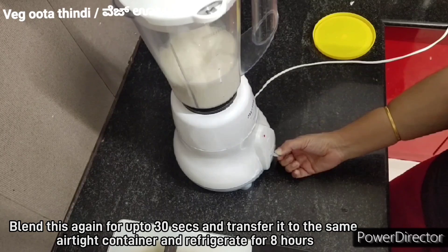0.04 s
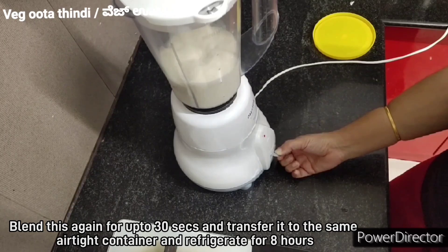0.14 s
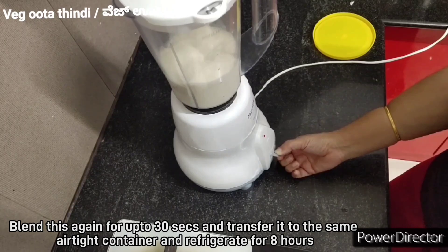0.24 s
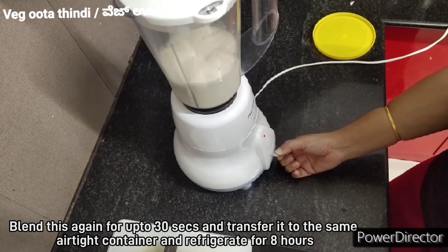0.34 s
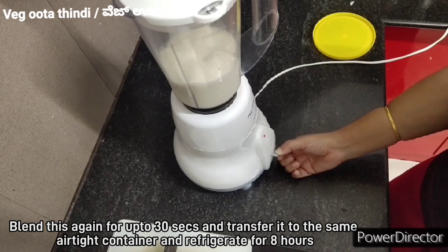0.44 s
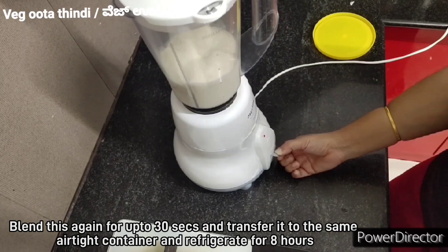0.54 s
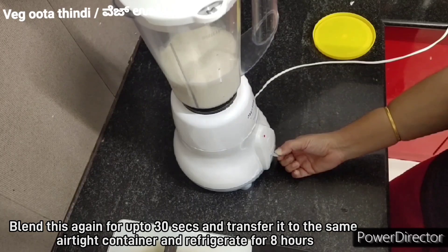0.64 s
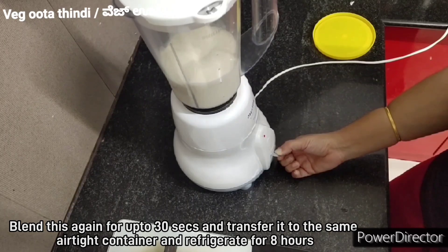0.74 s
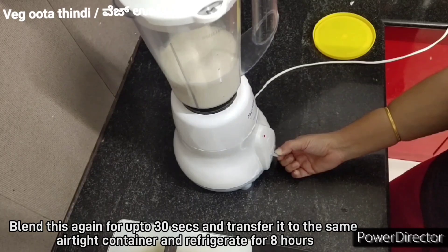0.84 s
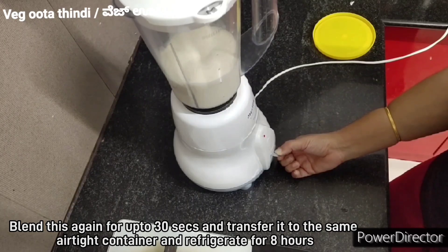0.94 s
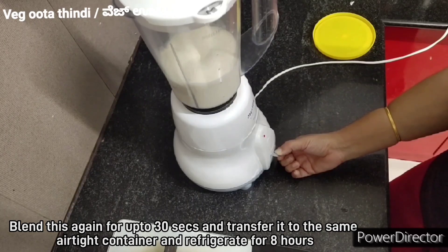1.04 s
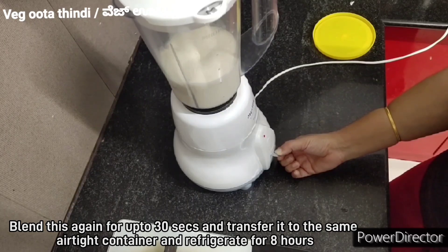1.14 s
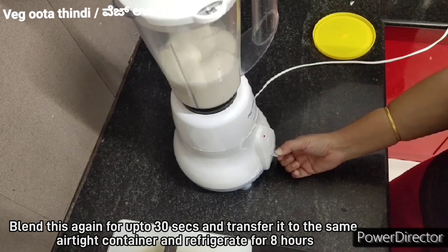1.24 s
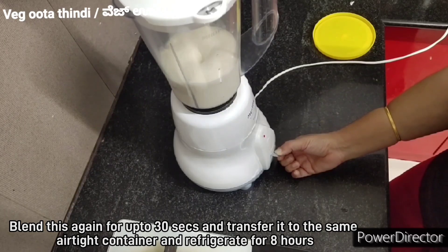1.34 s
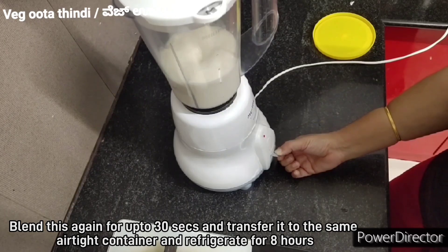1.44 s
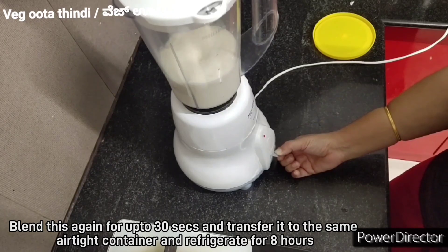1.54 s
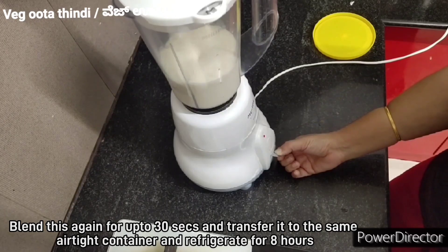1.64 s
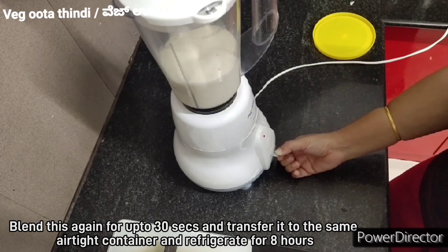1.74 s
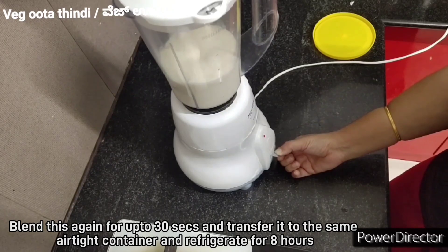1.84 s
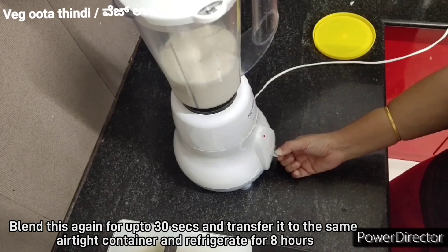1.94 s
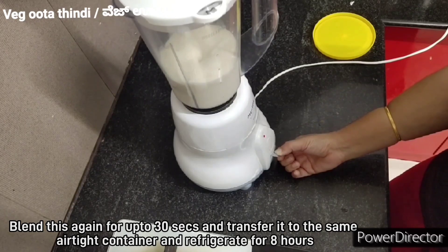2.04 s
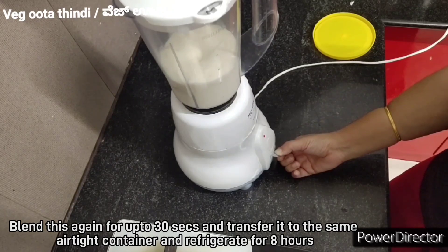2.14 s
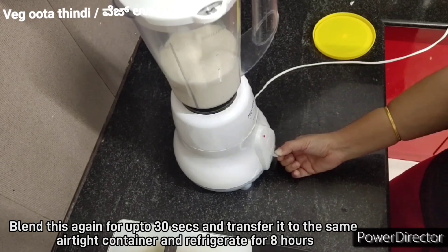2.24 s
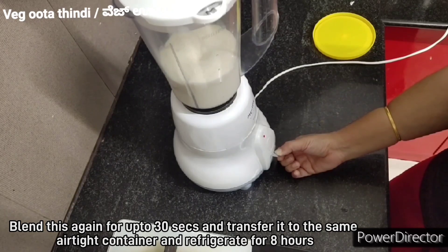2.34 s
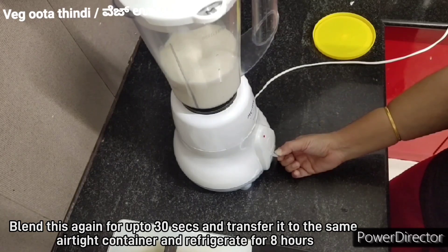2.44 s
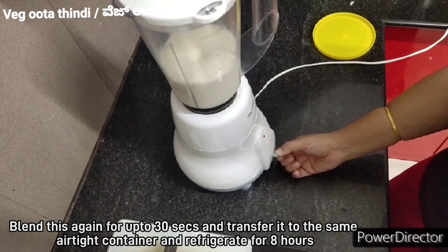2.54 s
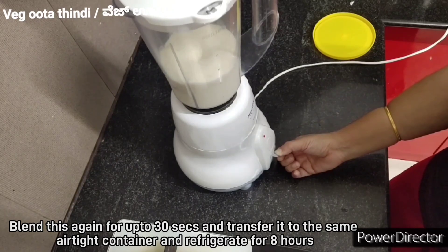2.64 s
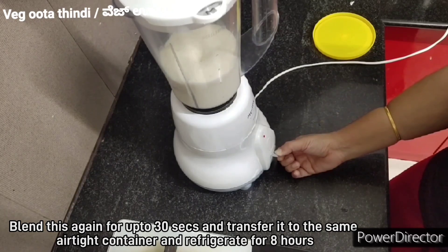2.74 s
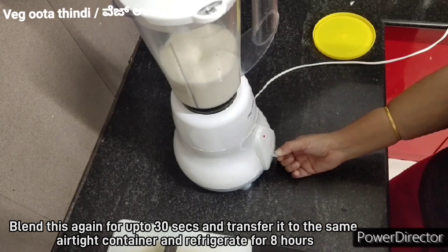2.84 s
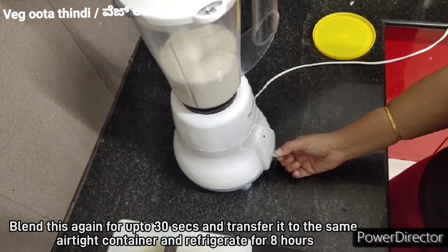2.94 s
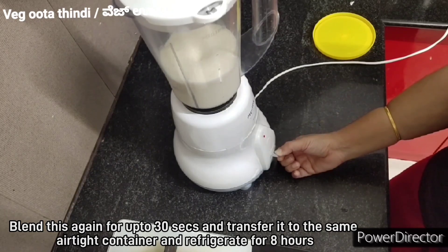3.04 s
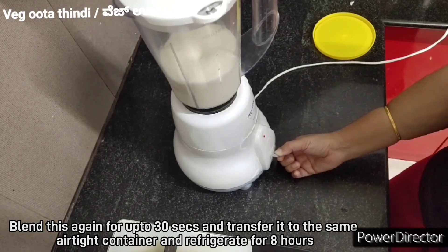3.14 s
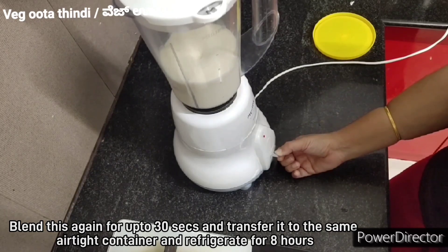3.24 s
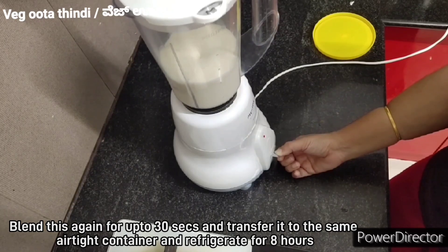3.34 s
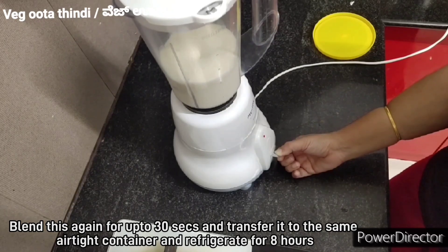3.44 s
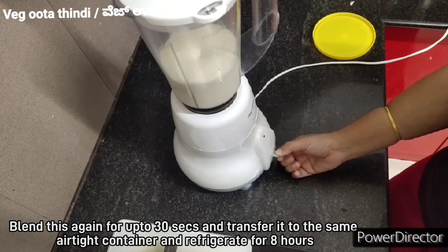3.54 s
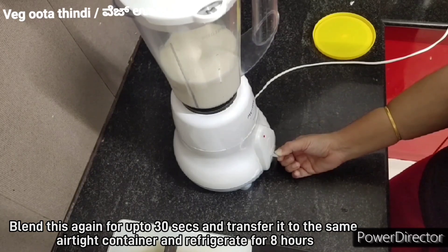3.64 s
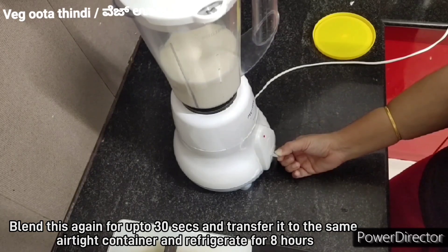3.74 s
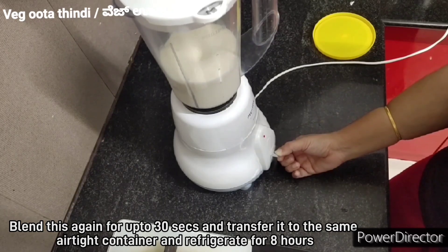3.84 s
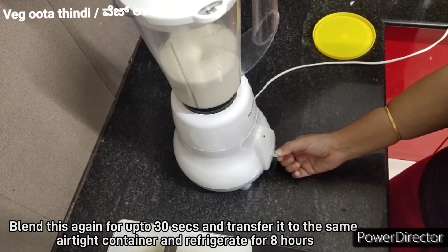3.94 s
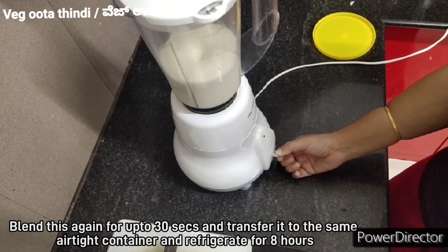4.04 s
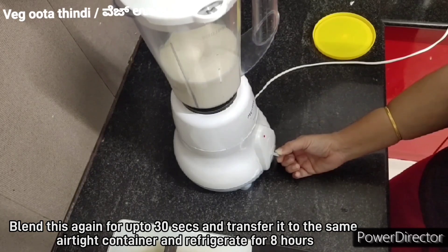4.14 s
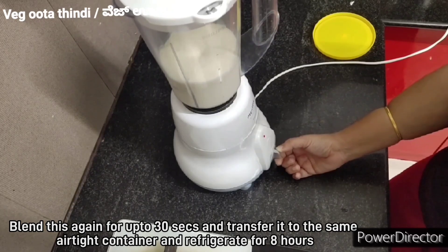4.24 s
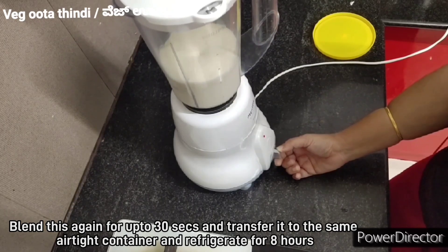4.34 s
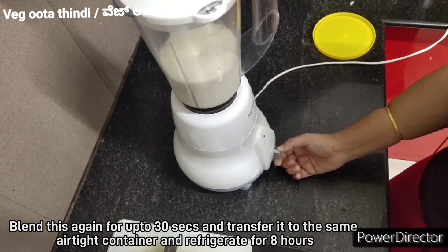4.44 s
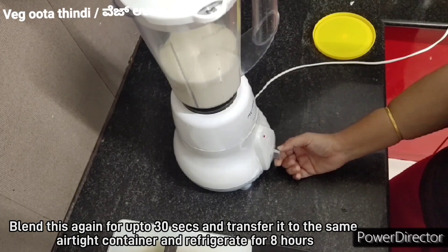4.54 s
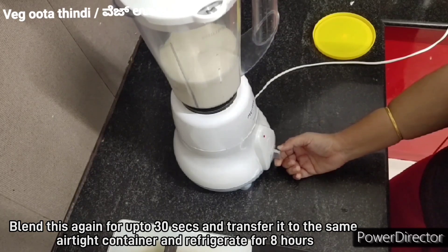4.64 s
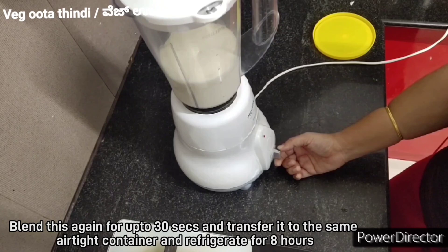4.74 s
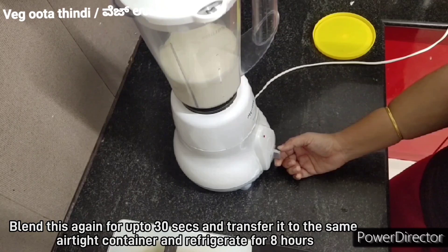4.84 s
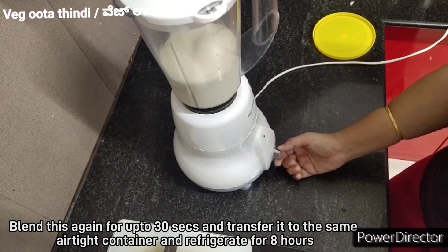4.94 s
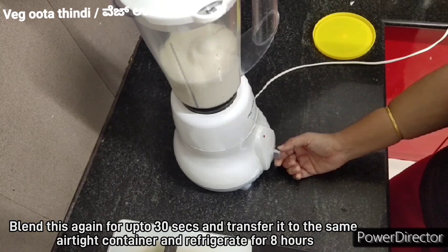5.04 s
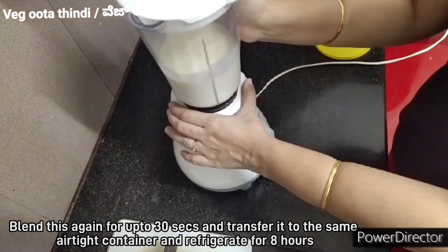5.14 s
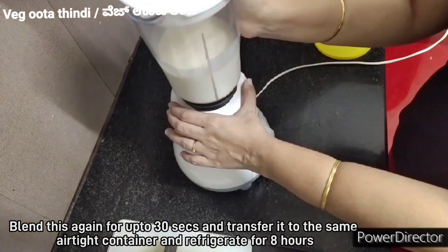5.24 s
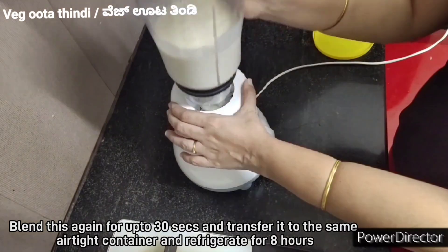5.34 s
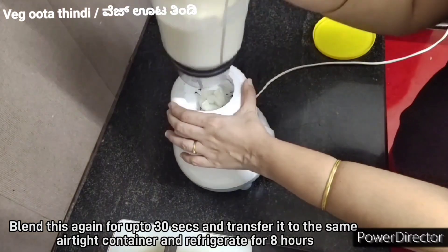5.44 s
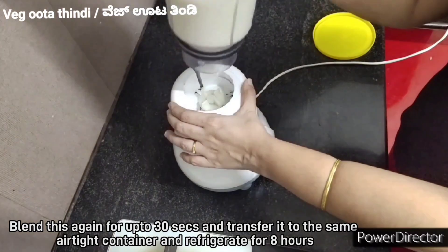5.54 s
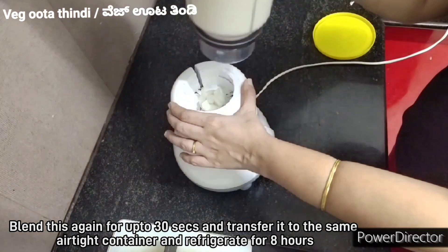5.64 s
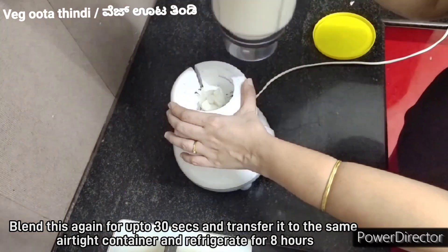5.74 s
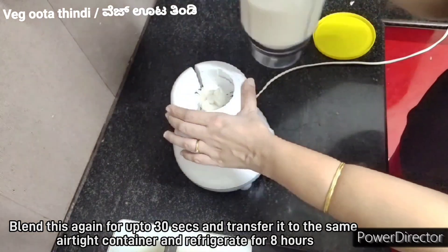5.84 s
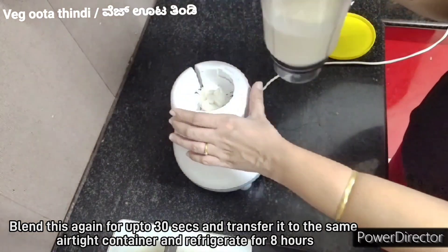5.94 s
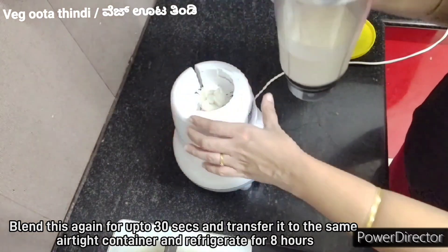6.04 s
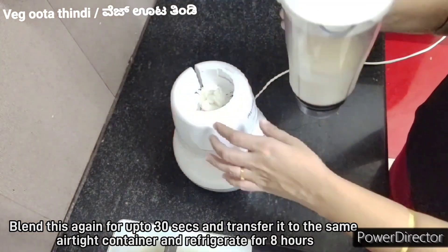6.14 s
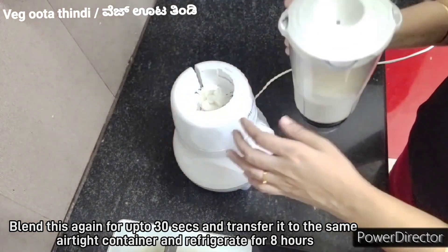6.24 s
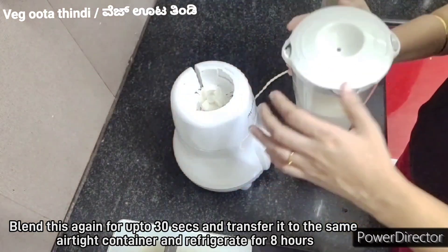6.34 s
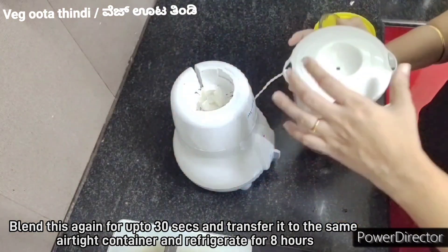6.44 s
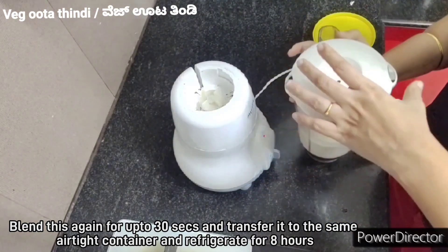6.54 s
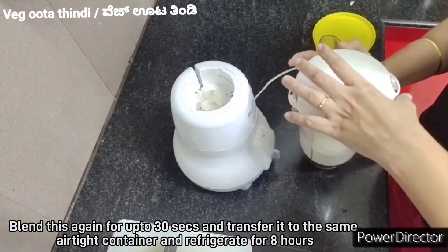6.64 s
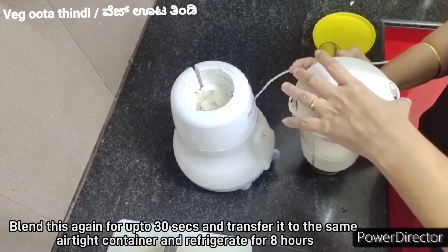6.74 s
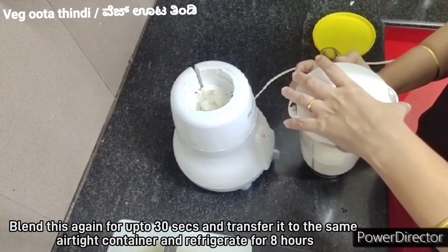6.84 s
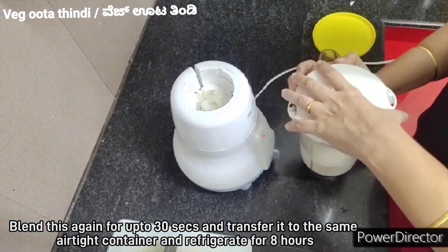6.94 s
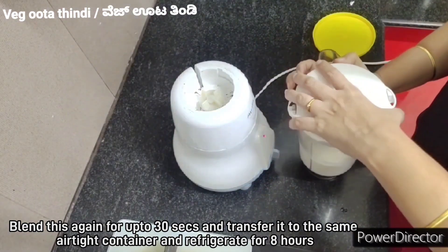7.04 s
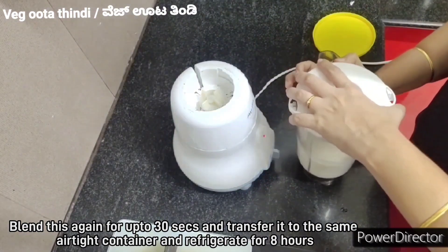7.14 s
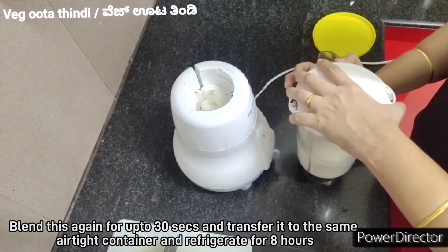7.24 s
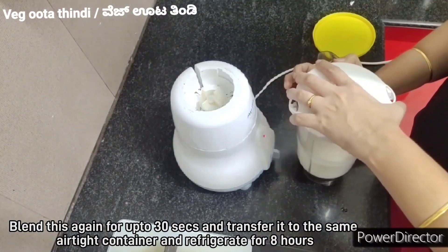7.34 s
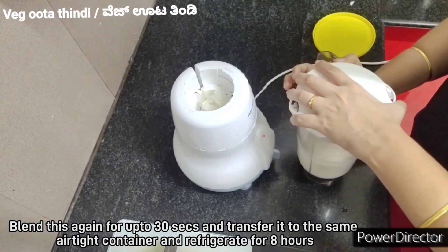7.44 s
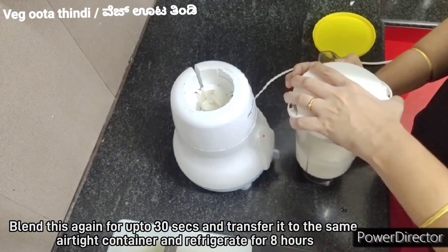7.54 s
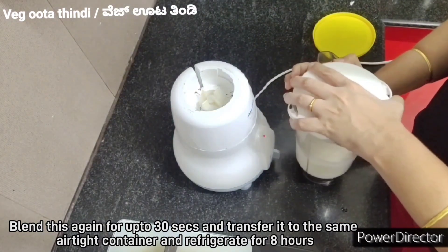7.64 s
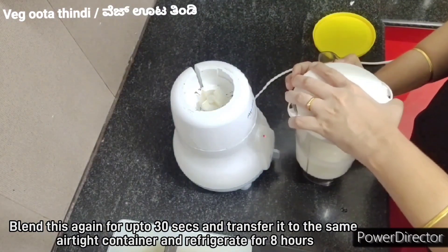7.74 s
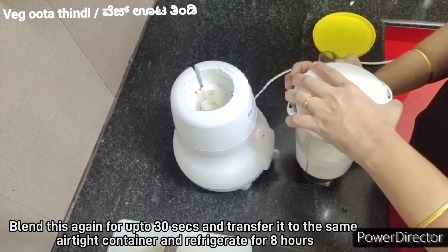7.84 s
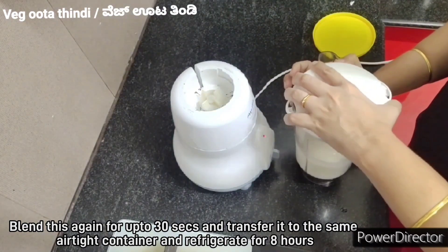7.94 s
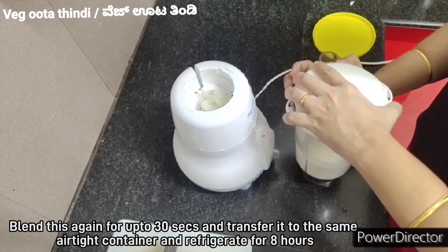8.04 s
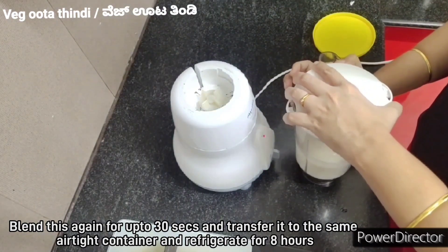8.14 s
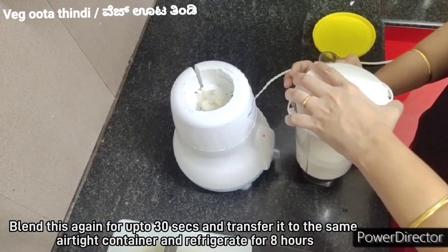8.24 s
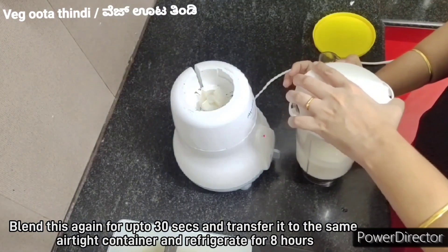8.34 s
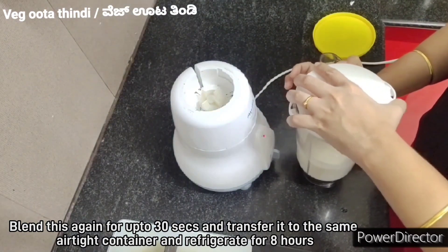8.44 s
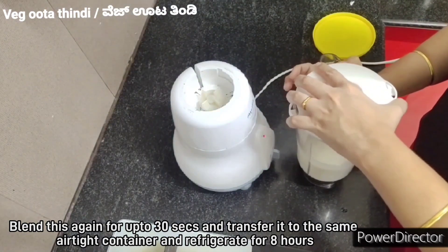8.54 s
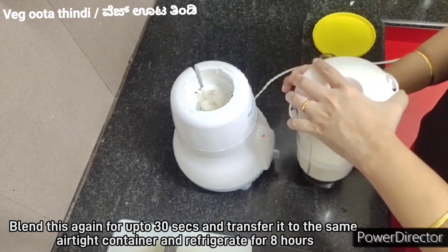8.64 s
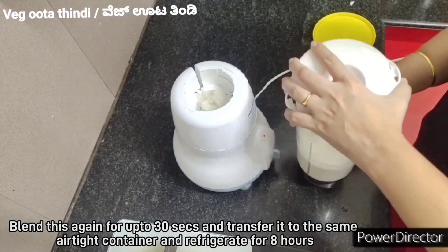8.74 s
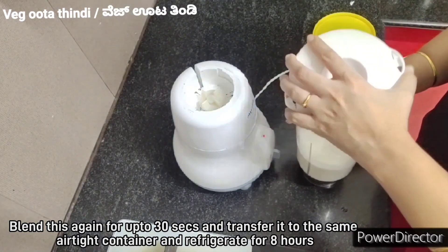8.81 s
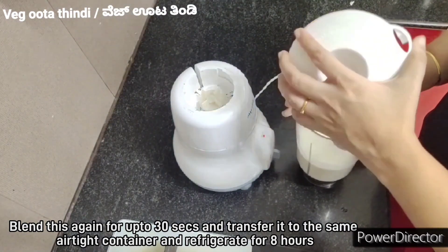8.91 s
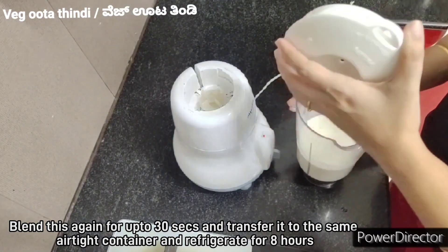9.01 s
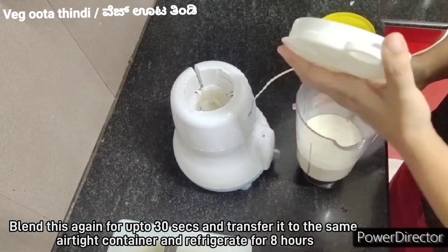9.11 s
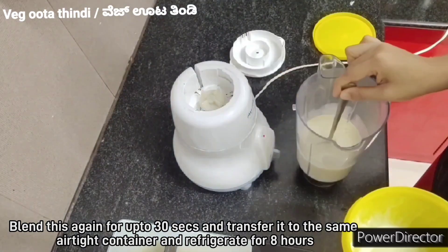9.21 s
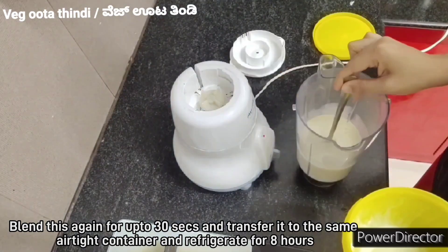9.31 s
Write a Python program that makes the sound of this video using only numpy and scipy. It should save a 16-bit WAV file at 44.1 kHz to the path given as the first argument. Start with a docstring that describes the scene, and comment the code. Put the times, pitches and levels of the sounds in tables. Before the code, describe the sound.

An electric blender hums and rattles as it churns a thick mix, its pitch rising in small steps. About halfway through it is switched off and coasts down with a light clatter. The plastic jar clicks off its base, then gives a few loud, hollow knocks on the stone counter. Rubs and smaller clicks follow as the tight lid is worked off. Everything sounds close, in a small tiled kitchen.

```python
"""A kitchen mixer-grinder hums and rattles as its blade churns a thick mix in a plastic jar.
It speeds up as the mix thins, is switched off and coasts down, coupling clattering, base shuddering.
The jar is twisted off its base and knocks on the stone counter; its tight lid is prised off with
rubs and clicks. A small tiled kitchen rings with the clatter and the handling, over a low rumble."""
import sys
import numpy as np
from scipy import signal
from scipy.fft import rfft, irfft, next_fast_len
from scipy.io import wavfile
from scipy.ndimage import uniform_filter1d, map_coordinates

SR = 44100
rng = np.random.default_rng(int(sys.argv[2]) if len(sys.argv) > 2 else 0)


def digitize_waveform(pressure):
    """Quantize a signal to 16-bit integers and store it at the path in sys.argv[1].

    Rows of a 2-D input are taken as channels; values are limited to [-1, 1].
    """
    field = np.atleast_2d(pressure).T
    bounded = np.clip(field, -1, 1)
    quanta = np.round(bounded * 32767).astype(np.int16)
    wavfile.write(sys.argv[1], SR, quanta)


N = 413254
TIME_S = np.arange(N) / SR


def amp(db):
    """Decibels to gain."""
    return 10 ** (np.asarray(db) / 20)


def unit(x):
    """Scale to rms 1."""
    return x / np.sqrt(np.mean(x ** 2) + 1e-20)


def along(points, hz):
    """(Hz, value) points read on a log axis."""
    knots_hz, values = np.transpose(points)
    return np.interp(np.log(hz + 1), np.log(knots_hz + 1), values)


def bells(rows, hz):
    """Sum of bell-shaped resonances."""
    return sum(height / (1 + (2 * (hz - centre) / width) ** 2) for centre, width, height in rows)


def wobble(rate_hz):
    """Smooth random curve, rate_hz knots a second."""
    knots = rng.standard_normal(int(N * rate_hz / SR) + 4)
    steps = np.arange(0, len(knots) - 1, 1 / 8)
    return np.interp(np.arange(N) * (rate_hz / SR), steps, map_coordinates(knots, [steps]))


def filtered(x, response):
    """Apply a gain given as a function of Hz."""
    length = x.shape[-1]
    size = next_fast_len(length + 8192, True)
    return irfft(rfft(x, size) * response(np.fft.rfftfreq(size, 1 / SR)), size)[..., :length]


# Stereo image. Each row: frequency in Hz, left-right correlation.
LIKENESS = [(60, 0.96), (110, 0.98), (200, 0.98), (380, 0.62), (700, 0.62), (1290, 0.099), (2380, 0.41),
            (4400, 0.12), (8120, 0.081), (15000, 0.07)]
def spread(pair):
    """Two unrelated signals become left and right: alike in the bass, less so in the treble."""
    def shares(hz):
        turn = np.arccos(np.clip(along(LIKENESS, hz), -1, 1)) / 2
        return np.array([np.cos(turn), np.sin(turn)])
    mid, side = filtered(pair, shares)
    return np.array([mid + side, mid - side])


def noise(spectrum, envelope=1):
    """Stereo noise of rms 1, modulated, then coloured."""
    white = spread(envelope * rng.standard_normal((2, N)))
    return unit(filtered(white, lambda hz: amp(along(spectrum, hz))))


def swirl(x, depth_db):
    """Narrow bands flare and sink, as when the mix tumbles or a rubbing contact shifts; rms 1."""
    bands = signal.stft(x, nperseg=1024)[2]
    field = uniform_filter1d(rng.standard_normal(bands.shape[1:]), size=4, axis=1)
    flare = amp(depth_db * unit(np.tanh(unit(field))))
    return unit(signal.istft(bands * flare, nperseg=1024)[1][:, :N])


def impulse(spectrum, pitch=1, size=4096):
    """Minimum-phase pulse with this spectrum, transposed by the factor pitch."""
    cepstrum = irfft(np.log(amp(along(spectrum, np.fft.rfftfreq(size, 1 / SR) / pitch))))
    cepstrum[1:size // 2] *= 2
    cepstrum[size // 2 + 1:] = 0
    return irfft(np.exp(rfft(cepstrum)))


# Shaft under power. Each row: time in seconds, speed in Hz.
SHAFT_SPEED = [(0.0, 113.4), (0.61, 114.8), (0.84, 116.7), (1.68, 116.1), (1.9, 133.7), (1.97, 137.7),
               (2.11, 137.2), (2.31, 129.3), (2.38, 130.1), (2.52, 135.6), (3.18, 135.6), (3.48, 144.3),
               (4.0, 144.3), (4.2, 140.8), (4.33, 143.1), (4.53, 156), (4.6, 153.4)]
FULL_HZ = 144
def shaft(off_s=4.586, drag_s=.57, stop_after_s=.79):
    """Powered speed in Hz, and coast: the share of it that drag and friction leave after switch-off."""
    drag = np.exp(-np.maximum(TIME_S - off_s, 0) / drag_s)
    friction = np.exp(-stop_after_s / drag_s)
    coast = np.maximum(drag - friction, 0) / (1 - friction)
    return np.interp(TIME_S, *np.transpose(SHAFT_SPEED)), coast


# Resonances of the base. Each row: centre in Hz, width in Hz, level in dB.
BASE_MODES = [(89, 24.5, -30), (116.3, 5, -42), (143.25, 19, -28.5), (224.2, 24, -35.5), (286.4, 35.5, -27),
              (358, 29, -36), (397.3, 16, -39)]
def hum(speed_hz, coast, angle):
    """The unbalanced blade pulls at the base; three orders sweep its resonances, shaken by lumps."""
    modes = [(hz, width, amp(db)) for hz, width, db in BASE_MODES]
    out = np.zeros(N)
    for order, shake_db in enumerate((.9, 1.3, 1.8), 1):
        level = bells(modes, order * speed_hz) * coast ** order * amp(shake_db * wobble(28))
        out -= level * np.cos(order * angle)
    return out


# Motor lines. Each row: multiple of the shaft speed, level in dB against the churning.
MOTOR_ORDERS = [(4, -12.5), (6, -14), (7, -15.5), (9, -14.5), (12, -24), (19, -23), (48, -27.5)]
def whine(angle):
    """The motor's weak upper lines waver in level and phase."""
    return sum(amp(db + 2.5 * wobble(14)) * np.sin(round(order) * angle + .8 * wobble(22))
               for order, db in MOTOR_ORDERS)


# Churning mix. Each row: frequency in Hz, relative density in dB.
CHURN_SPECTRUM = [(25, -26), (55, -30), (100, -10), (200, -14), (330, -6), (500, -5.5), (800, 1.5),
                  (1000, -2.5), (1400, -4), (1900, -9), (3000, -52.5)]
def churn(angle):
    """The blade slaps the mix unevenly, a little harder once a turn."""
    slaps = amp(0.79 * wobble(260) + 0.82 * wobble(40)) * (1 + 0.093 * np.sin(angle))
    return swirl(noise(CHURN_SPECTRUM, slaps), depth_db=1.8)


# Drive rattle, rasp and lumps. Each row: frequency in Hz, relative density in dB.
RATTLE_SPECTRUM = [(700, -28.5), (1400, -1), (1900, -1), (2500, 4), (3600, 2), (4400, -9), (5200, -7.5),
                   (6500, -58.5), (10000, -55)]
def rattle(angle):
    """The drive chatters in step with the shaft, along with the coupling's rasp and the lumps."""
    pulsing = 1 + .2 * np.sin(angle) + .14 * np.sin(4 * angle)
    chatter = noise(RATTLE_SPECTRUM, amp(1.6 * wobble(700) + 1.1 * wobble(30)) * pulsing)
    return swirl(amp(-3.3) * chatter + amp(-5) * rasp(angle) + amp(-9) * lumps(), depth_db=3.6)


def rasp(angle, turn_likeness=.79, play_rad=.3, play_hz=17, points=256):
    """The coupling rasps on each turn nearly as on the last; its play makes the partials waver."""
    place = np.maximum(angle + play_rad * wobble(play_hz), 0) / (2 * np.pi) * points
    turns = rng.standard_normal((2, N // points, points))
    roughness = signal.lfilter([1], [1, -turn_likeness], turns, axis=1).reshape(2, -1)
    pair = np.array([np.interp(place, np.arange(len(track)), track) for track in roughness])
    pair = (pair - pair[:, -1:]) * np.sqrt(np.abs(np.gradient(angle)))  # silent at a standstill
    return unit(filtered(spread(pair), lambda hz: amp(along(RATTLE_SPECTRUM, hz))))


def lumps(hits_per_s=38, scatter_db=3, decay_samples=256):
    """Lumps of the mix hit the blade at random; each is a short rattle in the jar."""
    hits = (rng.random(N) < hits_per_s / SR) * amp(scatter_db * np.tanh(rng.standard_normal(N)))
    decay = np.exp(-np.arange(4 * decay_samples) / decay_samples)
    return noise(RATTLE_SPECTRUM, signal.fftconvolve(hits, decay)[:N])


# Fan air. Each row: frequency in Hz, relative density in dB.
FAN_SPECTRUM = [(3000, -23.5), (5000, -8), (6000, 0), (7500, 0), (9000, -4.5), (10500, -9.5),
                (12500, -16.5), (15000, -18)]
def fan():
    """Air from the fan makes a fluttering hiss."""
    return swirl(noise(FAN_SPECTRUM, amp(1.2 * wobble(600) + .9 * wobble(35))), depth_db=2.5)


# Resonances and notches of jar and housing. Each row: centre in Hz, width in Hz, lift in dB.
HOUSING_COLOUR = [(214, 72, 10), (297, 19, 13), (417, 53, 2), (644, 74, 5.5), (702, 33, 3.5), (853, 18, 4),
                  (939, 200, -4.5), (1014, 13, 6.5), (1210, 150, 6.5), (1450, 22, 4), (1562, 100, -5.5),
                  (1740, 13, 8.5), (1870, 51, 5), (2045, 140, 6.5), (2148, 31, -10), (2196, 47, 7),
                  (2330, 41, 3), (2690, 50, 0), (2822, 39, 3), (2947, 48, -6.5), (3160, 60, -0.5),
                  (3270, 60, 1), (3683, 130, 3), (4180, 65, 9), (4290, 50, 8), (4450, 54, 8),
                  (4660, 50, 7.5)]
# Their stereo balance. Each row: frequency in Hz, left minus right in dB.
HOUSING_BALANCE = [(60, -6.5), (99, -5.5), (160, -8.5), (270, 12.5), (450, 1.5), (740, 2), (1220, -3),
                   (2010, -0.5), (3330, 1), (5500, -1), (9080, 0.5), (15000, 0)]
def housing(x):
    """Jar and housing colour the sound and throw each band to one side."""
    sides = np.array([[.5], [-.5]])
    return filtered(x, lambda hz: amp(bells(HOUSING_COLOUR, hz) + sides * along(HOUSING_BALANCE, hz)))


# Singing jar. Each row: centre in Hz, width in Hz, level in dB at FULL_HZ, speed exponent.
JAR_DRONES = [(204.6, 35, -42.5, 1.5), (417, 14, -52, -3.5), (510, 130, -47, 0.5), (769, 120, -50, -7),
              (1208, 28, -35, 3.5), (1271, 44, -36, 2)]
def drones(powered_hz):
    """The tumbling mix sets the jar's resonances singing, each with its own dependence on speed."""
    pair = np.zeros((2, N))
    for hz, width, db, exponent in JAR_DRONES:
        level = amp(db) * (powered_hz / FULL_HZ) ** exponent
        wave = (wobble(width) + 1j * wobble(width)) * np.exp(2j * np.pi * hz * TIME_S)
        pair += level * np.array([wave.real, wave.imag])
    return spread(pair) * amp([[-1], [1]])


# Room background. Each row: frequency in Hz, relative density in dB.
RUMBLE_SPECTRUM = [(25, -26), (55, -5), (85, -4), (140, -10), (220, -19.5), (400, -21.5), (650, -22.5),
                   (900, -36.5), (2500, -45.5), (4500, -43.5), (8000, -39), (15500, -49)]
def rumble(level_db=-64):
    """The room rumbles, low and slightly uneven."""
    return amp(level_db + 1.4 * wobble(23)) * noise(RUMBLE_SPECTRUM)


# Base on its feet. Each row: frequency in Hz, relative density in dB.
FEET_SPECTRUM = [(40, -31), (70, -12.5), (90, 2.5), (115, -3), (180, -14.5), (215, 4), (250, -15.5),
                 (305, -7), (360, -31.5), (800, -67)]
def shudder(coast):
    """The base shudders on its rubber feet midway through the coast."""
    return amp(-34.5) * (1 - coast) * coast ** .75 * noise(FEET_SPECTRUM)


# Struck housing. Each row: centre in Hz, width in Hz, relative level in dB.
HOUSING_MODES = [(422, 16, 2), (755, 30, -15.5), (1168, 57, 3.5), (1250, 50, 3.5), (2060, 30, 3),
                 (2590, 24, -6.5), (3270, 60, -10.5), (3560, 35, -13), (3660, 60, -3), (4400, 45, -5),
                 (4520, 65, -6)]
def clatter(angle, coast, teeth=4, flurry_db=4, flurry_hz=32, room_db=-2):
    """Unloaded, the coupling's teeth knock in flurries, hardest once a turn, and ring the housing."""
    knocks = np.diff(np.floor(teeth * angle / (2 * np.pi)), prepend=0)
    knocks = knocks * amp(4 * rng.standard_normal((2, N)))
    flurries = amp(flurry_db * (np.tanh(wobble(flurry_hz)) + np.cos(angle)))
    knocks = unit(knocks * flurries) * (1 - coast) * coast ** .56
    modes = [(hz, width, amp(db)) for hz, width, db in HOUSING_MODES]
    rms_gain = np.sqrt(np.mean(bells(modes, np.fft.rfftfreq(8192, 1 / SR)) ** 2))
    ring = filtered(spread(knocks), lambda hz: bells(modes, hz) / rms_gain)
    return amp(-35.5) * (ring + amp(room_db) * kitchen(ring))


def mixer(slack_db=-1.5, slack_below=.95, slack_span=.096):
    """One shaft drives every layer; after switch-off the drive goes slack and each dies at its own rate."""
    powered_hz, coast = shaft()
    speed_hz = powered_hz * coast
    angle = 2 * np.pi * np.cumsum(speed_hz * (1 + 0.003 * wobble(25))) / SR
    churn_gain = amp(-30.5) * coast ** 1.09
    rattle_gain = amp(-31.5) * coast ** .92
    fan_gain = amp(-43.5) * (powered_hz / FULL_HZ) ** .88 * coast ** 1.37
    slack_gain = amp(slack_db * np.clip((slack_below - coast) / slack_span, 0, 1))
    motor = churn_gain * whine(angle)
    rush = housing(slack_gain * (churn_gain * churn(angle) + rattle_gain * rattle(angle) + fan_gain * fan()))
    singing = drones(powered_hz) * coast ** 1.86
    return motor + rush + singing + shudder(coast) + hum(speed_hz, coast, angle) + clatter(angle, coast)


# Kitchen reverberation. Each row: frequency in Hz, T60 in seconds.
KITCHEN_T60 = [(100, 0.51), (300, 0.56), (800, 0.36), (2800, 0.41), (8000, 0.26), (15000, 0.53)]
ROOM_DB = 3.5
def kitchen(x, build_s=.004):
    """Tiled walls answer; each frequency dies at its own rate."""
    hz, t, bands = signal.stft(spread(rng.standard_normal((2, SR // 2))), SR, nperseg=256)
    tail = signal.istft(bands * amp(-60 * t / along(KITCHEN_T60, hz)[:, None]), SR, nperseg=256)[1]
    tail *= 1 - np.exp(-np.arange(tail.shape[1]) / SR / build_s)
    return signal.fftconvolve(x, tail / np.linalg.norm(tail[0]), axes=1)[:, :x.shape[-1]]


def thud(t, hz, t60_s=.057, rise_s=.003):
    """Counter or jar wall gives one dull, damped tone."""
    return np.gradient(np.sin(2 * np.pi * hz * t) * amp(-60 * t / t60_s) * (1 - np.exp(-t / rise_s)))


# Filled jar. Each row: frequency in Hz, relative level in dB, T60 in seconds.
JAR_MODES = [(200, -3, .045), (323, -7.5, .17), (370, -4, .04), (475, -9, .03), (590, -3, .028),
             (735, 3, .032), (1010, -13, .02), (2810, -25, .09)]
def jar_knock(t, pitch, t60_share, detune=.024):
    """The knocked jar rings; the shifting grip damps it and detunes each mode from hit to hit."""
    ring = np.zeros(len(t))
    for k, (hz, db, t60_s) in enumerate(JAR_MODES):
        envelope = amp(db + rng.normal(0, 1) - 60 * t / (t60_s * t60_share))
        gripped_hz = hz * pitch * (1 + rng.normal(0, detune))
        ring += (-1) ** k * envelope * np.sin(2 * np.pi * gripped_hz * t)
    return ring


def slip(t, count=5, gap_s=.0011, gap_ratio=.7, grating_db=-1):
    """The rim lets go in a few sharp clicks that crowd together, over a brief grating."""
    gaps_s = gap_s * gap_ratio ** np.arange(count) * rng.uniform(.6, 1.4, count)
    sizes = rng.choice([-1, 1], count) * amp(rng.normal(0, 2, count))
    starts = np.round((np.cumsum(gaps_s) - gaps_s[0] / 2) * SR).astype(int)
    clicks = np.bincount(starts, sizes, len(t))
    grating = t * np.exp(-t / gap_s) * rng.standard_normal(len(t))
    burst = unit(clicks) + amp(grating_db) * unit(grating)
    return burst / np.linalg.norm(burst)


# Lid click and its bright tick. Each row: frequency in Hz, relative level in dB.
CLICK_SPECTRUM = [(300, -8), (900, -6.5), (1400, -1.5), (2200, 0.5), (3000, 5), (4100, -7.5), (5500, -6.5),
                  (9000, -39)]
TICK_SPECTRUM = [(2500, -27), (5000, 4.5), (6500, 2), (7800, 5), (9000, -8), (11000, -16.5), (15000, -19.5)]
# Jar and lid contacts. Each row: start in seconds, thud energy in dB, thud pitch in Hz, knock energy in dB,
# jar pitch factor, share of T60 the grip leaves, hardness (click over knock) in dB, click pitch factor.
HITS = [(5.463, -48, 120, -52.5, 1, .5, 2.5, 0.76), (5.506, -51, 120, -45, 1.5, .5, 0.5, .75),
        (5.542, -38, 113, -60, 1, 0.63, 24, 1.5), (5.619, -47, 129, -40, 1.3, .6, -3, .9),
        (5.646, -37, 139, -30.5, 1.47, 0.88, 5, .95), (5.777, -44, 120, -46.5, .9, .8, -2, 0.5),
        (7.256, -12.5, 110, 3, 0.99, 1, -20.5, 1), (7.527, -10, 99.5, -7, 1, 0.82, -7, 1.05),
        (7.878, -26, 95, -15, 0.83, 0.4, -9.5, 0.8), (7.885, -12.5, 89, -11.5, 1.1, 0.41, 2.9, 0.95),
        (8.243, -28, 168, -45.5, 0.92, 0.5, -4.5, .75), (8.271, -37, 169, -47.5, 0.94, .5, -5.5, 0.66),
        (8.344, -41, 165, -27, 0.75, 0.61, -11, 0.6), (8.356, -26, 95, -22.5, 1.01, 1, -10, 0.64),
        (8.385, -33, 119, -33.5, 1.1, 0.75, -4, 0.77), (8.476, -30.5, 94, -51, 0.88, .4, -14, .8),
        (8.6246, -26, 105, -23.5, 0.86, 0.28, -1, 0.83), (8.783, -16.5, 165, -40, 1, 0.32, -5, .8),
        (8.803, -25, 242, -26.5, .98, 0.61, -12.5, 0.68), (8.903, -31, 167, -36, 1.2, 0.37, -9, .8),
        (8.946, -29, 85, -51, 1.1, .4, -9, .8), (9.02, -42, 99, -31.5, 0.93, 1, 2, 0.85)]
def contacts(tick_db=-5, tick_slope=1.3, snap_room_db=2):
    """Each contact thuds, rings the jar and cracks at the lid: the harder, the brighter."""
    out = np.zeros((2, N + SR))
    t = np.arange(3 * SR // 4) / SR
    def sized(part, db):
        return np.pad(amp(db) * part / np.linalg.norm(part), (0, len(t) - len(part)))
    tick = impulse(TICK_SPECTRUM)
    for start_s, thud_db, thud_hz, knock_db, jar_pitch, t60_share, hard_db, click_pitch in HITS:
        body = sized(thud(t, thud_hz), thud_db) + sized(jar_knock(t, jar_pitch, t60_share), knock_db)
        click = sized(impulse(CLICK_SPECTRUM, click_pitch), knock_db + hard_db)
        snap = click + sized(tick, knock_db + tick_db + tick_slope * hard_db)
        crack = signal.fftconvolve(snap, slip(t))[:len(t)]
        to_walls = amp(ROOM_DB) * body + amp(snap_room_db) * snap  # walls blur the clicks into one snap
        out[:, round(start_s * SR):][:, :len(t)] += body + crack + kitchen(to_walls[None])
    return out[:, :N]


def strokes(rows):
    """Envelope of strokes that swell and fade by 20 dB per rise or fall time."""
    return sum(amp(db) * 10 ** -np.maximum((peak_s - TIME_S) / rise_s, (TIME_S - peak_s) / fall_s)
               for peak_s, rise_s, fall_s, db in rows)


# Sliding lid. Each row: frequency in Hz, relative density in dB.
LID_SPECTRUM = [(500, -11.5), (1500, -11), (3200, -6.5), (5500, -10.5), (7800, 0), (9500, -12.5),
                (12000, -16.5), (15000, -19)]
# Lid strokes. Each row: peak, rise and fall in seconds, level in dB.
LID_STROKES = [(5.55, 0.028, 0.1, -57), (5.64, .09, 0.039, -57.5), (6.29, .09, 0.13, -74.5),
               (7.515, 0.17, 0.018, -46.5), (7.875, 0.025, .038, -53), (8.36, 0.017, 0.018, -55),
               (8.62, .04, .01, -69), (8.795, 0.042, .033, -50.5), (8.97, .09, 0.033, -63.5),
               (9.03, 0.021, 0.016, -48)]
def lid_rubs():
    """The plastic lid slides on the jar in tiny slips: a bright rub that swells until it lets go."""
    return strokes(LID_STROKES) * swirl(noise(LID_SPECTRUM, amp(1.5 * wobble(900))), depth_db=4.5)


# Scraping rim. Each row: frequency in Hz, relative density in dB.
RIM_SPECTRUM = [(200, -16), (500, 1), (1200, 0.5), (2400, 0.5), (3600, -5), (5500, -10.5), (10000, -24),
                (15000, -22)]
# Jar wall resonances. Each row: centre in Hz, width in Hz, lift in dB.
WALL_MODES = [(492, 40, 5), (970, 30, 4.5), (1100, 40, 3.5), (1264, 60, 5), (1380, 60, 5.5),
              (1680, 80, 2.5), (2210, 70, 6), (2580, 45, 8.5), (2867, 50, 5.5)]
# Rim strokes. Each row: peak, rise and fall in seconds, level in dB.
RIM_STROKES = [(5.62, 0.29, 0.26, -64), (6.29, 0.37, 0.3, -68.5), (6.8, 1.5, 5.9, -78),
               (8.8, 0.12, 0.083, -64.5), (9.03, 0.035, .028, -52), (9.2, 0.29, .35, -80)]
def rim_scrapes():
    """Duller, jerky scrapes of the rim ring the jar wall."""
    jerks = amp(5 * wobble(340) + 2 * wobble(30))
    wall = filtered(noise(RIM_SPECTRUM, jerks), lambda hz: amp(bells(WALL_MODES, hz)))
    return strokes(RIM_STROKES) * swirl(wall, depth_db=4.5)


# Faint tones. Each row: peak in seconds, half length in seconds, pitch in Hz, level in dB.
FAINT_TONES = [(5.794, 0.13, 470, -63.5), (6.2, 0.11, 1450, -71), (6.273, 0.067, 950, -72),
               (6.543, 0.22, 3250, -80), (6.826, 0.17, 3250, -74)]
def faint_rings(waver_rad=1.6):
    """Faint rings swell, waver and fade while the jar is carried."""
    out = np.zeros(N)
    for peak_s, half_s, hz, db in FAINT_TONES:
        envelope = amp(db + 3.7 * wobble(35)) * np.exp(-((TIME_S - peak_s) / half_s) ** 2)
        out += envelope * np.sin(2 * np.pi * hz * TIME_S + waver_rad * wobble(70))
    return out


def scene():
    """The mixer, then the jar handled in the ringing room."""
    rubbing = lid_rubs() + rim_scrapes()
    return mixer() + contacts() + rubbing + amp(ROOM_DB) * kitchen(rubbing) + rumble() + faint_rings()


DIP_S, DIP_HALF_S, DIP_DB = 5.432, .01, -4.5
TOP_HZ = 15500
def record(dry):
    """The level dips briefly once the shaft stands; everything above TOP_HZ is cut."""
    dip = amp(DIP_DB * np.exp(-((TIME_S - DIP_S) / DIP_HALF_S) ** 2))
    return filtered(dry * dip, lambda hz: hz < TOP_HZ)


dry = scene()
out = record(dry)
digitize_waveform(out)
```